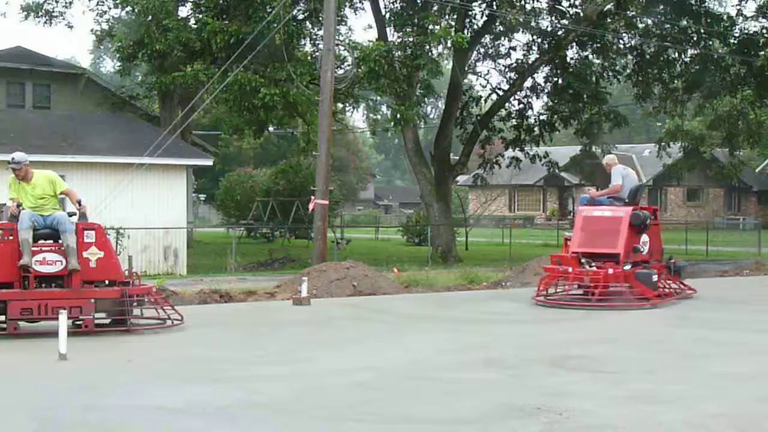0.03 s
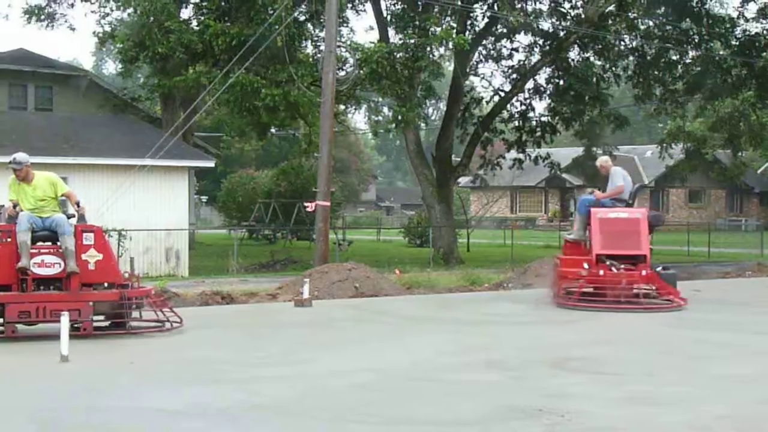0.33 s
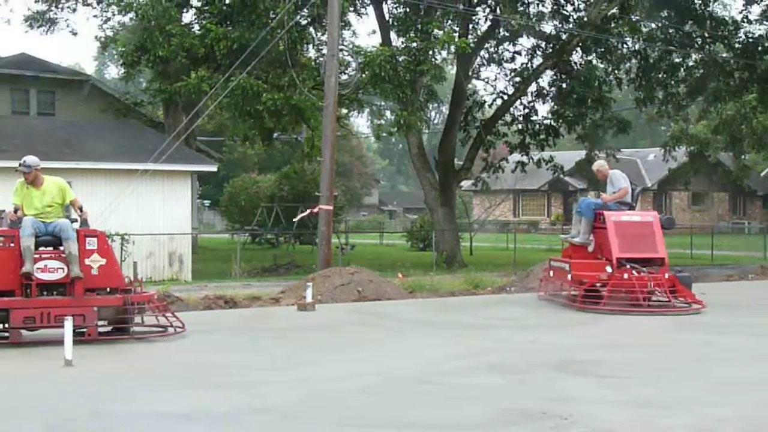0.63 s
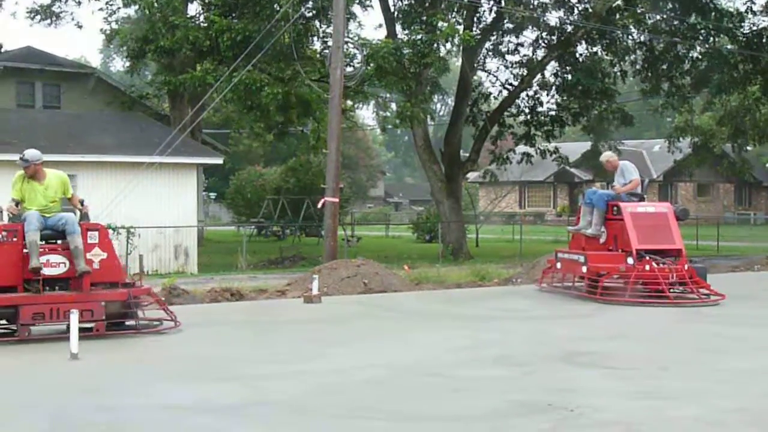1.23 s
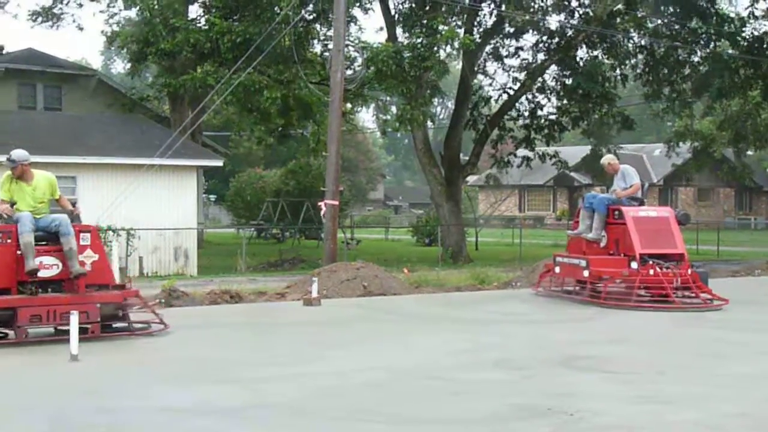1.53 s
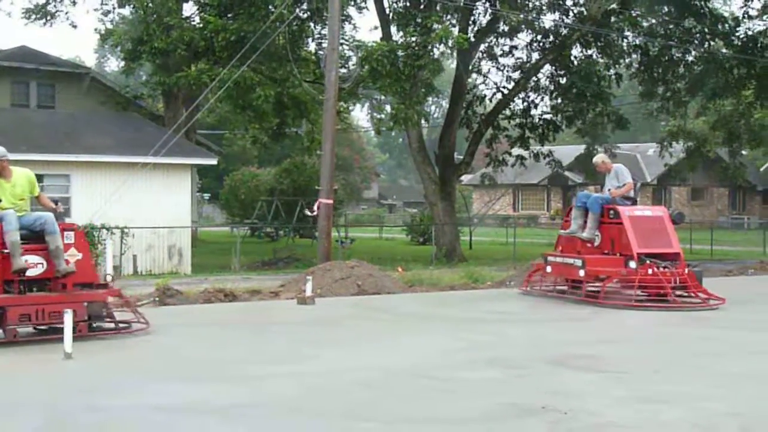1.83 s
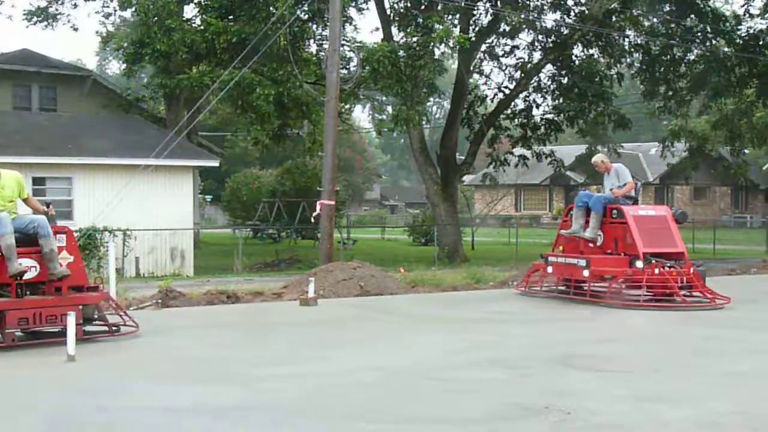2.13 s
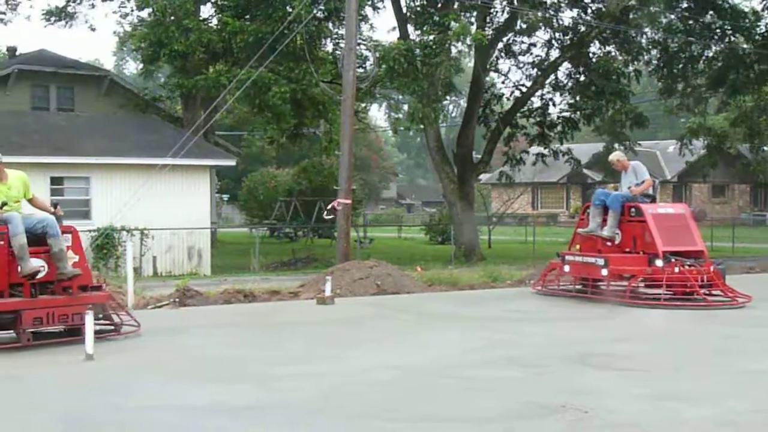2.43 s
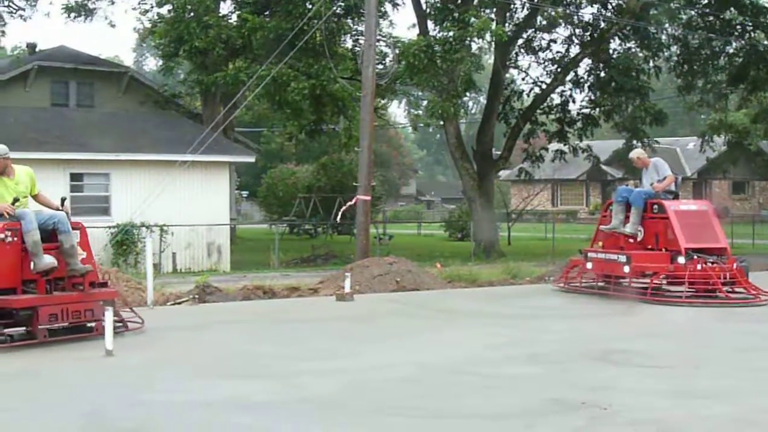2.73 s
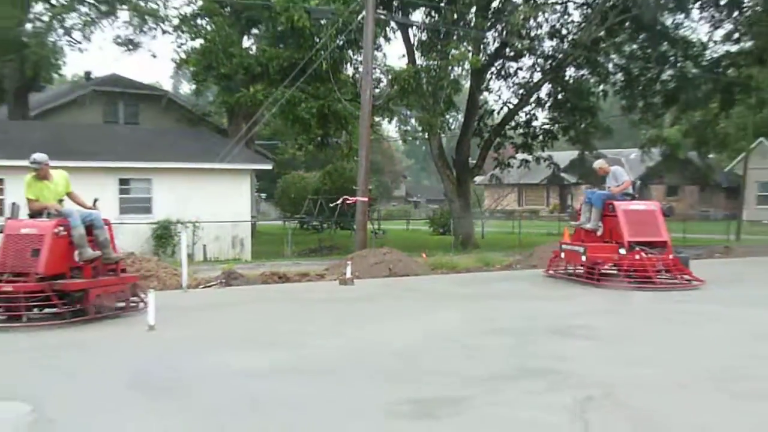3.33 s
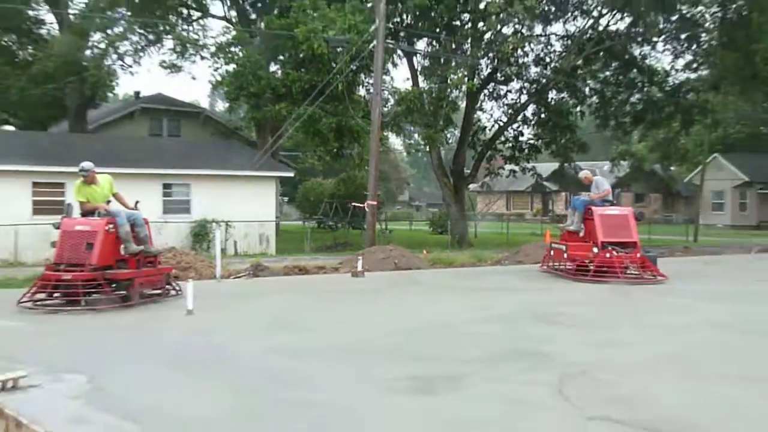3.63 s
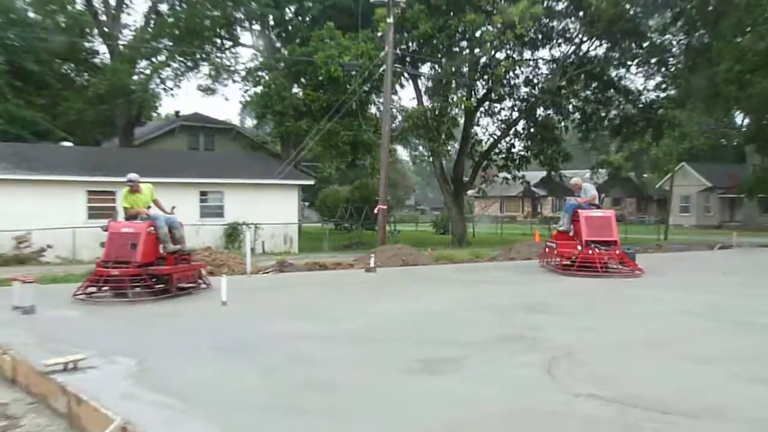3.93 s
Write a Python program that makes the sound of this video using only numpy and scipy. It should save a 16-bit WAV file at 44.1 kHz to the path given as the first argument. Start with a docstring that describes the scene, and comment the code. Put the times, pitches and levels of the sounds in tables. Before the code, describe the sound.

A steady engine drone comes from two ride-on concrete trowels in the open air, one nearer than the other. Fans whine and valves clatter while the blades scrape the wet slab, and the drone thickens as the machines turn.

```python
"""Outdoors on a wet concrete slab, two ride-on power trowels circle, engines held at working speed.
Each four-cylinder exhaust drones on harmonics of its firing cycle over a low boom and a rough burble.
Valves clatter, fans whine, and the steel blades scrape the slab, making friction noise.
The sound grows fuller as the machines turn, and the level dips briefly a few times."""
import sys
import numpy as np
from scipy import signal
from scipy.fft import rfft, irfft, next_fast_len
from scipy.io import wavfile
from scipy.ndimage import uniform_filter1d, map_coordinates

SR = 44100
rng = np.random.default_rng(int(sys.argv[2]) if len(sys.argv) > 2 else 0)


def unload_audio(sound):
    """Save the sound as a 16-bit wav file, at the path given as the first command line argument."""
    columns = np.transpose(np.atleast_2d(sound))
    # keep every value between -1 and 1, then stretch to whole-number steps
    steps = np.round(np.clip(columns, -1, 1) * 32767)
    wavfile.write(sys.argv[1], SR, steps.astype(np.int16))


N = 176400
CYLINDERS = 4


def near_drone(cycle):
    """Periodic firing puts the near engine's tones on whole multiples (orders) of its cycle rate."""
    # throb at the firing rate: time_s, level_db
    throb = [(0, -44.5), (.4, -53), (.6, -48), (.78, -43.5), (1.2, -43), (1.8, -41.5), (2.6, -40.5),
             (3.2, -41.5), (3.6, -46.5), (4, -45.5)]
    # hum at twice the firing rate: time_s, gain_db
    hum = [(0, -12.5), (.3, -3), (.7, -1.5), (1.2, -2), (1.8, -1.5), (2.6, -0.5), (3.4, 1), (3.8, -4),
           (4, -10)]
    # pipe note, strong while the tailpipe faces the listener: time_s, level_db
    pipe_note = [(0, -50), (1.3, -54), (1.9, -40), (2.3, -36.5), (2.55, -33.5), (2.85, -33.5),
                 (3.15, -36.5), (3.5, -48), (4, -50)]
    # weaker harmonics of the cycle: order
    orders = (10, 12, 18, 19, 20, 23, 25, 64, 72, 84, 90)
    # their strengths: level_db
    levels = [-51.5, -45, -43.5, -52, -49, -51, -50, -53, -54.5, -56.5, -55.5]
    # tones ringing out in turns, on the nearest order: peak_s, half_length_s, pitch_hz, level_db
    overtones = [(.08, .22, 457, -45), (.08, .22, 582, -42), (.2, .2, 1121, -50), (1.75, .7, 540, -39.5),
                 (2.2, 1.15, 561, -40), (2.7, .8, 582, -44), (2.2, .8, 748, -47), (2.15, .8, 789, -47.5),
                 (3.62, .25, 228, -41.5), (3.78, .25, 436, -41)]
    firing, cycle_hz = CYLINDERS * cycle, cycle[-1] * SR / N
    tones = amp(curve(throb)) * partials(firing, [1], [0], waver_db=0.5)
    tones += amp(curve(hum)) * partials(firing, [2], [-32.3], waver_db=1.13)
    tones += amp(curve(pipe_note)) * partials(cycle, [24], [0], waver_db=1)
    tones += partials(cycle, orders, levels, waver_db=1.5)
    for s, half, hz, db in overtones:
        tones += swell(s, half) * partials(cycle, [round(hz / cycle_hz)], [db], waver_db=2)
    return tones


def far_drone(firing):
    """The far engine's periodic exhaust sounds a harmonic series on twice its firing rate."""
    # harmonics of that rate: order
    orders = (2, 3, 4, 5, 6)
    # their strengths: level_db
    levels = [-45.5, -48.5, -45, -51, -58]
    # rise and fall of the whole drone: time_s, gain_db
    gain = [(0, 3.5), (.3, -0.5), (.8, -0.5), (1.4, -3), (2.1, -1), (2.7, 2), (3.3, 2.5), (4, -9)]
    return amp(curve(gain)) * partials(2 * firing, orders, levels, waver_db=3)


def exhaust_boom(firing):
    """Pulsating gas flow: low noise, amplitude-modulated at the firing rate."""
    # strength of the boom: time_s, level_db
    level = [(0, -34), (.8, -38), (1.5, -36.5), (2.1, -34.5), (2.7, -34.5), (3.3, -33.5), (4, -32)]
    # its spectrum: frequency_hz, density_db
    spectrum = [(25, -25), (60, -22.5), (95, -7.5), (130, -8.5), (175, -2.5), (210, 3.5), (265, -1.5),
                (320, -3), (450, -7.5), (900, -40.5), (3000, -88.5)]
    return amp(curve(level)) * coloured(puffs(firing, depth=0.31), spectrum)


def exhaust_burble(near_firing, far_firing, pulse_share=0.2, jitter_s=0.00026):
    """Firing pulses excite pipe resonances and add in power to the noise of the gas flow."""
    # strength of the burble: time_s, level_db
    level = [(0, -32), (.25, -34), (.85, -32), (1.2, -33), (1.6, -33), (2.3, -34.5), (3.1, -31.5),
             (3.6, -30.5), (4, -31.5)]
    # its spectrum: frequency_hz, density_db
    spectrum = [(60, -39), (200, -17.5), (310, -6.5), (380, 0.5), (460, -1), (560, 2), (650, 0), (780, -5),
                (950, -7.5), (1200, -17.5), (3000, -39), (6000, -85)]
    # surges under load: peak_s, half_length_s, gain_db
    surges = [(0.107, 0.046, 3), (.88, 0.082, 2), (1.408, 0.027, 4.5), (2.304, .05, 4), (2.82, 0.018, 3.5),
              (3.09, .02, 3), (3.844, .03, 1.5)]
    firings = unit(pulses(near_firing, jitter_s) + pulses(far_firing, jitter_s))
    flow = puffs(near_firing, depth=0.077)
    exhaust = np.sqrt(pulse_share) * firings + np.sqrt(1 - pulse_share) * flow
    surge_db = sum(db * swell(s, half) for s, half, db in surges)
    return amp(curve(level) + surge_db + 0.58 * wobble(14)) * coloured(exhaust, spectrum)


def blades():
    """Sliding friction of steel on wet concrete makes uneven noise, louder where a blade bites."""
    # strength of the scrape: time_s, level_db
    level = [(0, -33), (.3, -36), (.6, -33), (.85, -33.5), (1.2, -34), (1.65, -34.5), (2.3, -35),
             (3.1, -34.5), (4, -34)]
    # its spectrum: frequency_hz, density_db
    scrape_spectrum = [(100, -27), (500, -6), (750, -1.5), (950, 4), (1150, -0.5), (1330, 2), (1550, 0),
                       (1900, -1.5), (2250, -7), (2700, -12), (2950, -17), (3550, -21.5), (4100, -30.5),
                       (4900, -38.5), (8000, -60)]
    # harder bites: peak_s, half_length_s, level_db, rasp_share
    bites = [(0.115, 0.04, -37, 0.1), (0.337, 0.02, -40, 0.4), (.735, 0.031, -33.5, 0.02),
             (0.859, 0.085, -34.5, 0.08), (0.931, 0.008, -37, 0.7), (1.44, 0.012, -36, 0.6),
             (1.668, 0.035, -37, 0.05), (1.95, 0.036, -44.5, 0.6), (3.145, .06, -43.5, 0.7)]
    # a bite's dull grind: frequency_hz, density_db
    grind_spectrum = [(300, -25), (700, -6.5), (950, -4.5), (1100, 0), (1330, 9), (1500, -7.5),
                      (1800, -3.5), (2400, -14.5), (3000, -21), (3650, -22), (4300, -36), (7000, -54)]
    # a bite's bright rasp: frequency_hz, density_db
    rasp_spectrum = [(800, -20), (1800, -2.5), (2300, 1.5), (2650, -1), (3000, -10.5), (3600, -15.5),
                     (4300, -29.5), (7000, -52)]
    scrape = amp(curve(level)) * coloured(patchy_noise(1.3), scrape_spectrum)
    grind = coloured(patchy_noise(-0.5), grind_spectrum)
    rasp = coloured(patchy_noise(2.5), rasp_spectrum)
    for s, half, db, rasp_share in bites:
        bite = np.sqrt(1 - rasp_share) * grind + np.sqrt(rasp_share) * rasp
        scrape += amp(db) * swell(s, half) * bite
    return amp(0.77 * wobble(23.93)) * scrape


def valve_clatter(cycle, far_firing, jitter_s=0.00008, lope_db=0.95):
    """Valve impacts set both frames ringing; the clatter swells once per cycle of the near engine."""
    # strength of the clatter: time_s, level_db
    level = [(0, -39.5), (.7, -43), (1.2, -41.5), (1.8, -38.5), (2.5, -39), (3.2, -38), (4, -38)]
    # its spectrum: frequency_hz, density_db
    spectrum = [(200, -33), (750, -4.5), (1150, -7.5), (1500, 1), (1800, 1), (1868, 3.5), (1940, 2),
                (2230, -4.5), (2700, -11.5), (2950, -17), (3550, -21), (4100, -29.5), (4900, -44),
                (8000, -60.5)]
    impacts = pulses(CYLINDERS * cycle, jitter_s) + 0.52 * pulses(far_firing, jitter_s)
    return amp(curve(level) + lope_db * np.cos(2 * np.pi * cycle)) * coloured(impacts, spectrum)


def belt_fan(cycle, passes_per_cycle=17.36):
    """A belt-driven fan sounds its blade-passing frequency, in fixed ratio to the engine's speed."""
    # strength of the tone: time_s, level_db
    level = [(0, -47), (.8, -42.5), (2.2, -42), (3.2, -41), (4, -40.5)]
    return amp(curve(level)) * partials(cycle, [passes_per_cycle], [0], waver_db=2)


def cooling_fan(blade_hz=440.2):
    """Each passing blade pushes the air, giving harmonics of the blade-passing frequency."""
    # harmonics of the blade rate: order
    orders = (1, 2, 3, 4, 5, 6, 8, 10)
    # their strengths: level_db
    levels = [-47.5, -52.5, -55, -53, -54, -62.5, -69.5, -88]
    return partials(count_cycles(blade_hz, unsteady=0.00301), orders, levels, waver_db=1.5)


def swelling_tones(flutter=0.5):
    """Engine hums and fan whines come and go, fluttering under random narrow-band modulation."""
    # hums and whines: peak_s, half_length_s, pitch_hz, level_db
    tones = [(0.2, 0.25, 977, -43), (3.58, .25, 199, -37), (3.15, 0.45, 221, -40),
             (3.17, 0.17, 2635, -55.5)]
    sound = np.zeros(N)
    for s, half, hz, db in tones:
        phase = 2 * np.pi * count_cycles(hz, unsteady=0.0019)
        in_phase = (1 + flutter * wobble(30)) * np.sin(phase)
        quadrature = flutter * wobble(30) * np.cos(phase)
        sound += amp(db) * swell(s, half) * unit(in_phase + quadrature)
    return sound


def dip_gains():
    """Brief attenuation, in ramps of decibels: one gain for the machinery, one for the blades."""
    # dips of the level: lowest_s, machinery_depth_db, blade_depth_db, fall_s, recovery_s
    dips = [(0.371, 6.5, 4.5, 0.015, 0.34), (1.04, 5, 0, 0.095, 0.1), (1.5, 5, -0.5, 0.027, 0.039),
            (2.39, 5, -0.5, 0.043, 0.056)]
    loss_db = sum(np.outer(depths, curve([(s - fall, 0), (s, 1), (s + recovery, 0)]))
                  for s, *depths, fall, recovery in dips)
    return amp(-loss_db)


def pulses(firing, jitter_s, scatter_db=2.5, t60_s=0.14):
    """One uneven impulse per firing, convolved with its cylinder's impulse response of pipe and frame."""
    t = np.arange(SR // 6) / SR
    rings = rng.standard_normal((CYLINDERS, len(t))) * amp(-60 * t / t60_s)
    onsets = np.flatnonzero(np.diff(np.floor(firing)))
    timing, strength = rng.standard_normal((len(onsets), 2)).T
    onsets = np.clip(onsets + np.round(jitter_s * SR * timing).astype(int), 0, N - 1)
    sizes = amp(scatter_db * strength)
    trains = [np.bincount(onsets[c::CYLINDERS], sizes[c::CYLINDERS], N) for c in range(CYLINDERS)]
    return unit(sum(signal.fftconvolve(train, ring)[:N] for train, ring in zip(trains, rings)))


def puffs(firing, depth):
    """Amplitude-modulated noise that swells once per firing."""
    return unit(np.exp(depth * np.cos(2 * np.pi * firing)) * rng.standard_normal(N))


def partials(cycle, orders, levels_db, waver_db):
    """Superposed sines on multiples of a cycle rate, each wavering about its rms level."""
    return np.sqrt(2) * sum(
        amp(db + waver_db * wobble(7)) * np.sin(2 * np.pi * (order * cycle + rng.random()))
        for order, db in zip(orders, levels_db))


def count_cycles(hz, unsteady):
    """Phase in cycles: the integral of a slightly unsteady frequency."""
    return np.cumsum(hz * (1 + unsteady * wobble(12))) / SR


def patchy_noise(depth_db):
    """White noise modulated by random patches of gain in time and frequency."""
    spectra = signal.stft(rng.standard_normal(N), nperseg=1024)[2]
    patches = uniform_filter1d(rng.standard_normal(spectra.shape), size=4, axis=0)
    patches = uniform_filter1d(patches, size=14, axis=1)
    return signal.istft(spectra * amp(depth_db * unit(patches)), nperseg=1024)[1][:N]


def coloured(x, spectrum):
    """x filtered by (frequency_hz, gain_db) rows, at rms 1."""
    knots_hz, db = np.transpose(spectrum)
    return unit(filtered(x, lambda hz: amp(np.interp(np.log(hz + 1), np.log(knots_hz), db))))


def filtered(x, response):
    """Linear filtering: the spectrum of x times a frequency response."""
    size = next_fast_len(N + SR // 2)
    return irfft(rfft(x, size) * response(np.fft.rfftfreq(size, 1 / SR)), size)[:N]


def swell(peak_s, half_length_s):
    """A Gaussian envelope, down to 1/e at half_length_s from its peak."""
    return np.exp(-((np.arange(N) / SR - peak_s) / half_length_s) ** 2)


def wobble(rate_hz):
    """A smooth curve through rate_hz random knots a second."""
    knots = rng.standard_normal(int(N * rate_hz / SR) + 4)
    return map_coordinates(knots, [np.arange(N) * rate_hz / SR])


def curve(rows):
    """Linear interpolation of (time_s, value) rows at every sample."""
    return np.interp(np.arange(N) / SR, *np.transpose(rows))


def amp(db):
    """Decibels as an amplitude ratio."""
    return 10 ** (np.asarray(db) / 20)


def unit(x):
    """x scaled to rms 1."""
    return x / np.sqrt(np.mean(x ** 2) + 1e-20)


def scene():
    """Both machines superpose in the open air at the edge of the slab."""
    # near engine's hum, at twice its firing rate: time_s, pitch_hz
    hum_pitch = [(0.0, 170.3), (0.15, 168.6), (0.45, 167.6), (0.7, 165.9), (1.1, 166.2), (1.6, 165.7),
                 (2.6, 166.1), (3.1, 165.2), (3.5, 166.5), (4.0, 167.1)]
    cycle = count_cycles(curve(hum_pitch), unsteady=0.0012) / (2 * CYLINDERS)
    near_firing = CYLINDERS * cycle
    far_firing = count_cycles(hz=79.325, unsteady=0.0017)
    machinery = near_drone(cycle) + far_drone(far_firing)
    machinery += exhaust_boom(near_firing) + exhaust_burble(near_firing, far_firing)
    machinery += valve_clatter(cycle, far_firing) + belt_fan(cycle) + cooling_fan() + swelling_tones()
    machinery_gain, blade_gain = dip_gains()
    return (machinery_gain * machinery + blade_gain * blades())[None]


def record(dry, hiss_db=-69.5, tone_db=-86.5, tone_hz=6667, cutoff_hz=8700):
    """A noise floor of faint hiss and a thin tone is added; a low-pass filter limits the band."""
    # spectrum of the hiss: frequency_hz, density_db
    spectrum = [(30, -2), (4500, -0.5), (7000, 1.5), (7700, -1), (8300, -10), (8800, -30.5)]
    hiss = amp(hiss_db) * coloured(rng.standard_normal(N), spectrum)
    tone = amp(tone_db) * np.sqrt(2) * np.sin(2 * np.pi * tone_hz * np.arange(N) / SR)
    return filtered(dry[0] + hiss + tone, lambda hz: hz < cutoff_hz)[None]


dry = scene()
out = record(dry)
unload_audio(out)
```